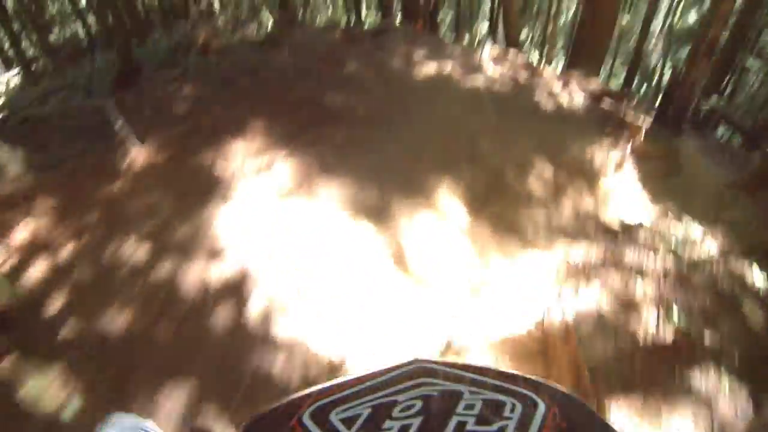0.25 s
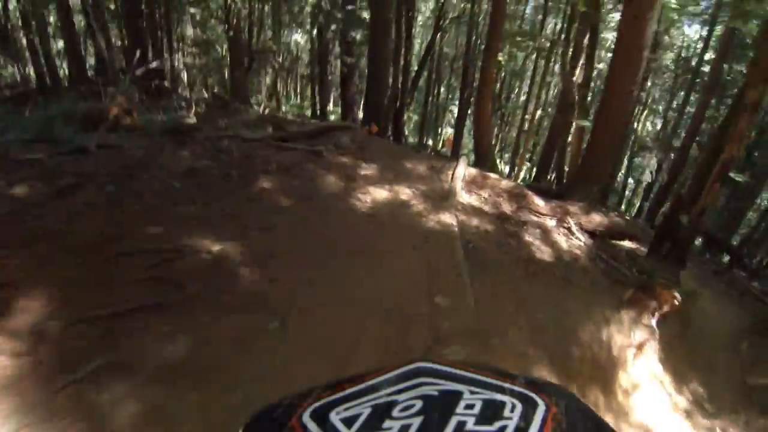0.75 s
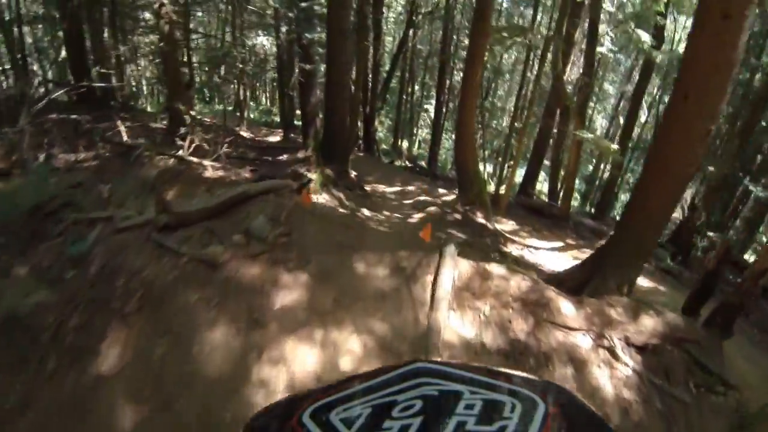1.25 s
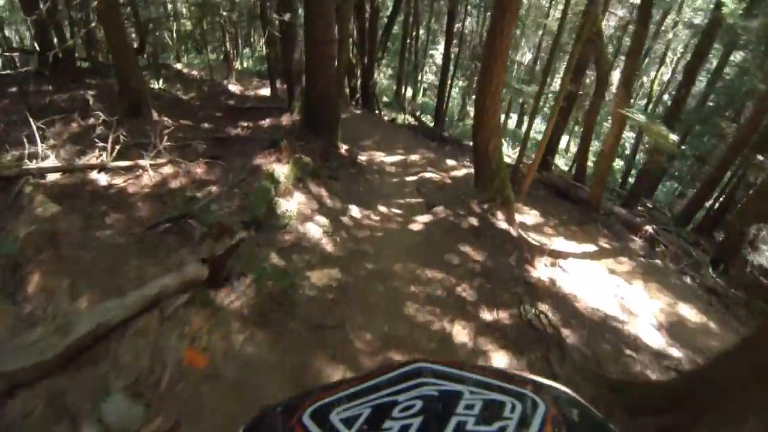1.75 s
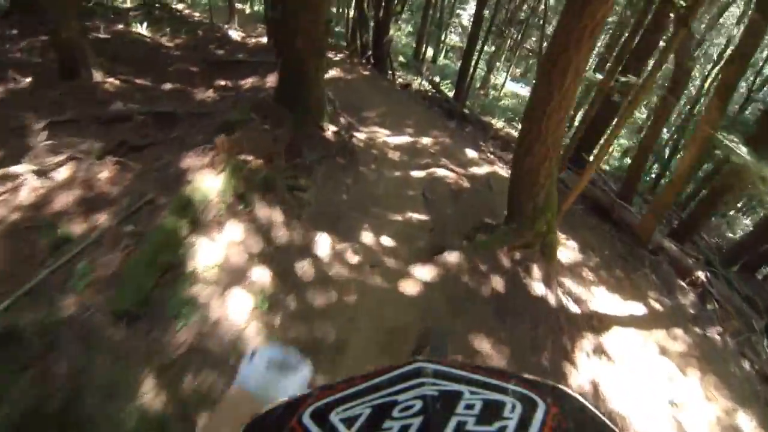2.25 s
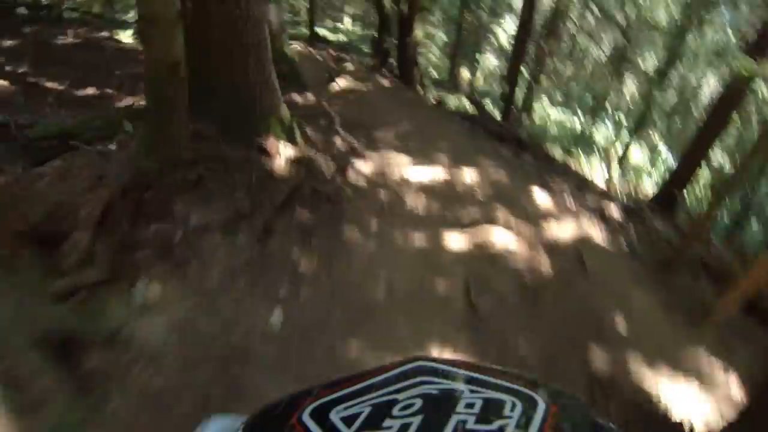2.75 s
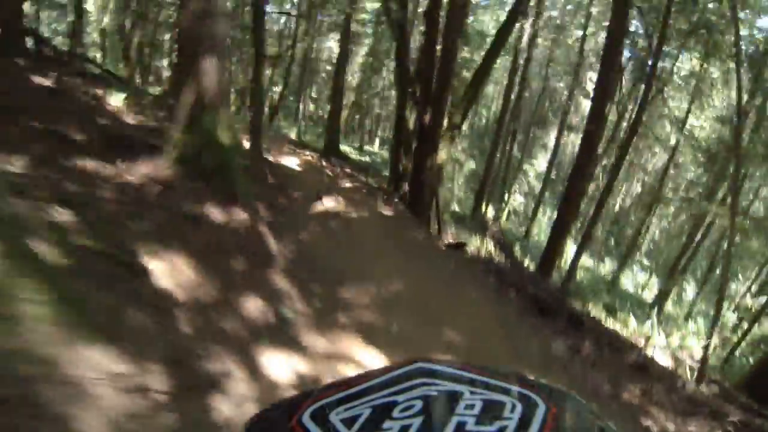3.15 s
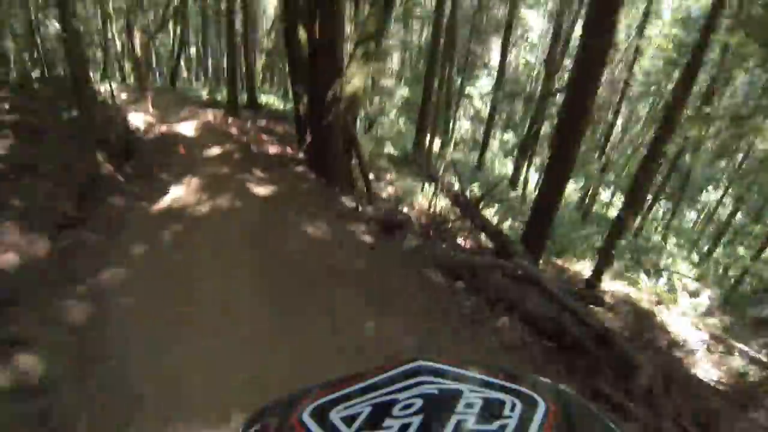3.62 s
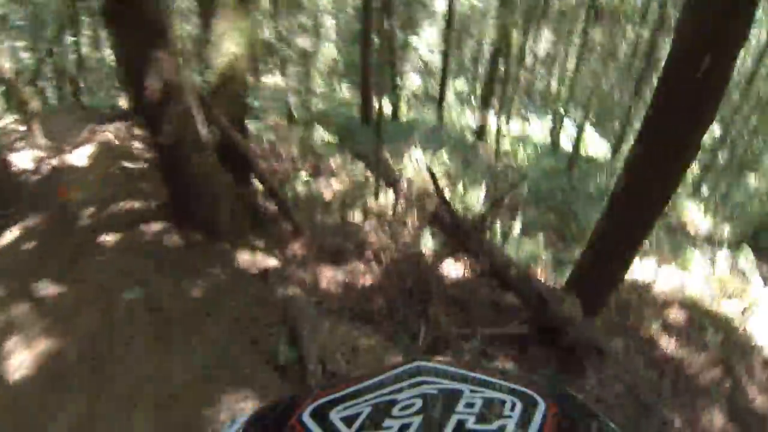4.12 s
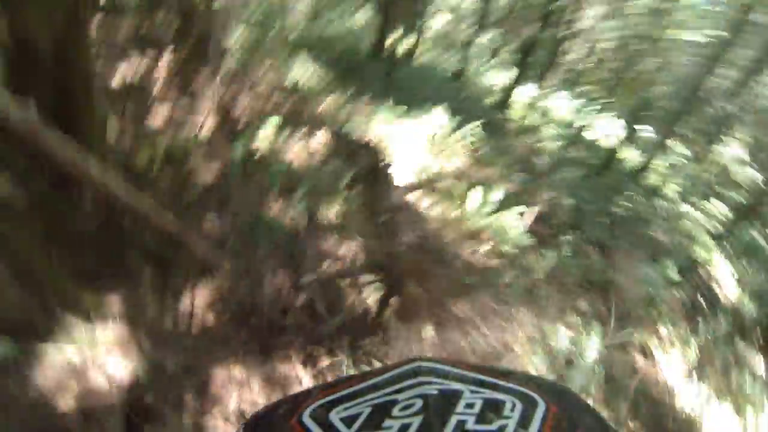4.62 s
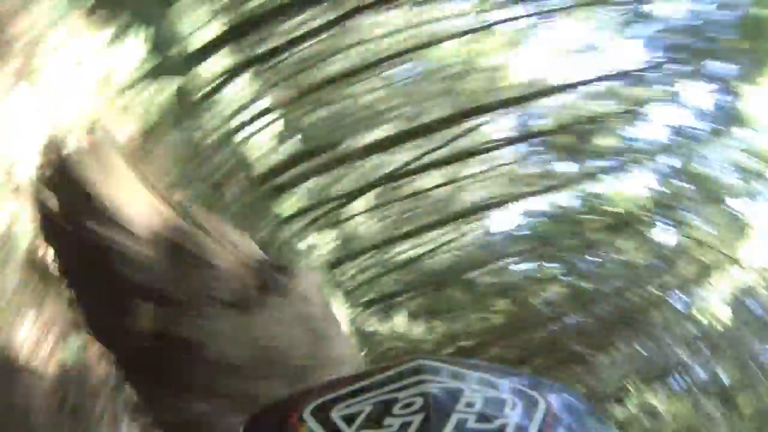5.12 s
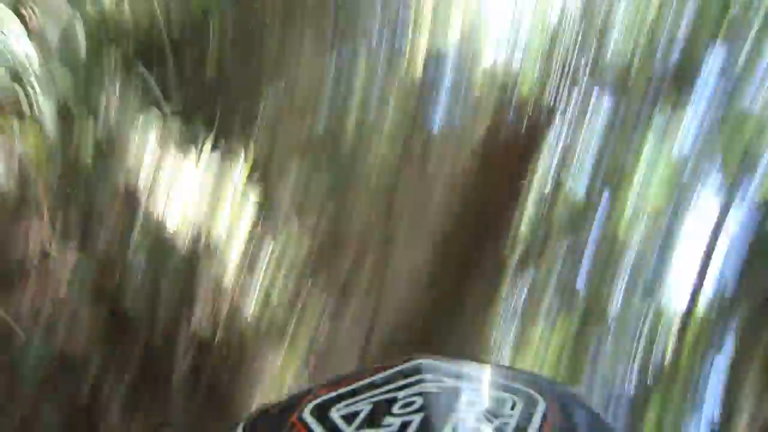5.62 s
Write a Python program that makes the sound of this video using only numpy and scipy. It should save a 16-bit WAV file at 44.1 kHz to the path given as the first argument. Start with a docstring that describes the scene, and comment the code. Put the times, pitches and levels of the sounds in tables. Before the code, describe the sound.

Stereo helmet microphone, dry outdoor sound with no echo. An early rattle over bumps settles into rapid, quiet freewheel clicking over soft tyre scrub. A short hop ends in a heavy clattering landing, and a second is harder still. A rough sliding tyre follows, then irregular metallic knocks, sharp twig cracks, dull body thuds and bursts of leafy hiss shifting from side to side.

```python
"""Mountain bike on a forest trail

A ride over dirt, heard in stereo at the rider's helmet, ends with bike and rider tumbling through brush.
Tyres, dust and skids are noise broken into grains; spokes and a brief whistle are grains in narrow bands.
Frame knocks, chain slaps, thuds, snaps and freewheel ticks are short noise bursts that ring resonances.
Shaking adds a rumble, and a low hum runs beneath it all.
"""
import sys
import numpy as np
from scipy import signal
from scipy.fft import rfft, irfft, next_fast_len
from scipy.io import wavfile

SR = 44100
rng = np.random.default_rng(int(sys.argv[2]) if len(sys.argv) > 2 else 0)


def transcribe(signal):
    """Save signal, clipped to [-1, 1], as a 16-bit WAV file at the path in sys.argv[1]."""
    frames = np.atleast_2d(signal).T
    limited = np.clip(frames, -1, 1)
    pcm = np.round(limited * 32767).astype(np.int16)
    wavfile.write(sys.argv[1], SR, pcm)


N = 258850  # length in samples

# Levels of all sources are before the clipping and treble cut in record().
# Plain rolling: (time [s], tyre casing scrub [dB], thrown dust and litter [dB])
ROLLING = [(0, -51, -43), (0.24, -40.5, -54), (0.55, -44.5, -50), (0.7, -41, -39), (0.85, -39, -39.5),
           (1.2, -45, -43.5), (1.55, -44.5, -49), (1.95, -46, -49), (2.25, -51, -47), (2.85, -42, -38.5),
           (3.4, -52, -39), (3.66, -49, -40.5), (4.0, -66, -37), (4.35, -35, -39.5), (4.62, -32, -31),
           (4.9, -40.5, -37), (5.45, -39, -29.5), (5.7, -42, -36.5), (5.87, -46, -40)]
# Tyres or bodies ploughing into loose ground: (start [s], hold from start [s], scrub [dB], dust [dB])
CRUNCHES = [(0.057, 0.025, -37, -38.5), (0.315, 0.24, -38.5, -39.5), (0.563, 0.079, -29, -32),
            (1.733, 0.071, -37.5, -39), (2.485, 0.15, -23.5, -27), (2.685, 0.053, -30, -28),
            (3.04, 0.069, -24, -27.5), (3.11, 0.098, -21, -30), (3.234, 0.089, -27.5, -28),
            (4.015, 0.075, -36, -54), (4.11, 0.2, -33, -34), (4.375, 0.18, -31.5, -28.5),
            (4.655, 0.081, -33.5, -31), (4.958, 0.22, -36.5, -41), (5.195, 0.2, -34.5, -24),
            (5.49, 0.078, -32, -39)]
CRUNCH_ATTACK_S, CRUNCH_RELEASE_DB_PER_S = 0.028, 245
GRIT_DB = -1  # grit against the mean of the scrub and dust levels
# Tyres off the ground: (leave [s], land [s], fading [dB/s])
HOPS = [(2.282, 2.484, 126), (2.955, 3.054, 250)]
# Where the tyres lie from the helmet: (time [s], left minus right [dB])
TYRE_SIDE = [(0, 2), (2.4, 3.5), (2.6, 1.5), (3.0, 5), (3.7, 6), (4.2, 1.5), (4.7, 2), (4.95, -8),
             (5.28, 4), (5.5, -5.5), (5.87, 9.5)]
# Resonances of the tyre casing: (pitch [Hz], width [Hz], level [dB])
TYRE_MODES = [(350, 150, -3.5), (501, 510, -1), (675, 400, 0), (982, 690, -4)]
# Resonances of crunching grit: (pitch [Hz], width [Hz], level [dB])
GRIT_MODES = [(1460, 260, -21), (2044, 2390, 22), (3870, 4800, -11)]
# Broad bands of dust hiss: (pitch [Hz], width [Hz], level [dB])
DUST_MODES = [(4360, 10700, 5.5), (8720, 15400, 1), (12040, 37000, 4)]
# Spokes singing: (time [s], level [dB])
SPOKE_LEVEL = [(.4, -61), (.6, -42), (1.3, -43.5), (1.6, -65), (2.2, -80)]
# Resonances of the spokes: (pitch [Hz], width [Hz], level [dB])
SPOKE_MODES = [(1250, 40, 0), (1590, 110, 3), (2540, 110, -7), (4100, 390, -10.5)]
# Shaking at the helmet: (time [s], level [dB])
SHAKE_LEVEL = [(0, -32.5), (0.15, -40), (0.33, -38.5), (0.7, -37.5), (0.85, -44), (1.55, -46),
               (1.72, -42.5), (2.25, -43), (2.33, -29.5), (2.47, -35), (2.57, -19.5), (2.72, -34),
               (3.15, -27.5), (3.4, -38.5), (3.76, -36), (3.9, -43.5), (4.36, -45.5), (4.42, -32),
               (4.62, -43), (4.7, -26), (4.8, -42), (5.1, -39), (5.47, -28), (5.56, -31), (5.87, -48)]
# Resonances of the shaking rumble: (pitch [Hz], width [Hz], level [dB])
RUMBLE_MODES = [(139, 160, -4.5), (244, 380, -2)]
DEEP_HZ, DEEP_DB = 54, -19  # deep part of the shaking, level against the rumble
HUM_HZ, HUM_WIDTH_HZ, HUM_DB = 70.8, 5.3, -49.5
# Chain and cable slaps: (time [s], peak [dB], centre [Hz])
SLAPS = [(0.0152, -14.5, 7250), (0.413, -11, 4540), (0.4456, -9.5, 5440), (0.5773, -7.5, 5330),
         (0.6075, -10, 4830), (0.6429, -8, 4830), (2.37, -34, 8200), (2.51, -17, 10000),
         (2.5275, -2.5, 4400), (2.5521, -9.5, 4450), (2.605, 0.5, 10600), (2.635, -13, 11800),
         (2.7196, -18, 12000), (3.0677, 2, 5400), (3.1028, -10.5, 4860), (3.1787, -11.5, 11200),
         (3.1945, -10.5, 5110), (3.2191, -7, 9660), (3.254, -9.5, 4800), (3.2819, -11, 11400),
         (3.3448, -3.5, 11100), (3.3536, -6, 4600), (3.478, -18, 4400), (3.6785, -17.5, 9130),
         (3.714, -10, 10800), (3.7277, -5.5, 11000), (3.776, -16.5, 7820), (4.0303, -3, 9100),
         (4.0635, -10, 7200), (4.127, -2.5, 8600), (4.3907, -9, 12000), (4.4022, 0.5, 7000),
         (4.4514, -13, 5120), (4.5033, -3, 5100), (4.7272, -9, 8000), (4.7414, -9, 4840),
         (4.8679, -9, 4820), (5.049, -19, 10400), (5.1408, -13, 7600), (5.1737, -7, 9400),
         (5.2108, -12, 4400), (5.2562, -4, 12100), (5.3614, -4.5, 9500), (5.4113, -14, 9880),
         (5.6381, -15, 9850)]
# Resonances of the chain: (pitch [Hz], width [Hz], level [dB])
CHAIN_MODES = [(3390, 1260, 4), (5070, 420, 6.5), (6930, 1680, 2), (10800, 3400, 5.5), (12300, 320, 0),
               (12400, 2000, -3.5)]
# Blows on the frame: (time [s], peak [dB], centre [Hz], left minus right [dB])
KNOCKS = [(0.016, -14.5, 3500, 2.5), (0.263, -8.5, 910, -0.5), (0.362, -14, 724, 4.0),
          (0.392, -25, 1150, 3.5), (0.413, -17, 2930, 0), (0.448, -19.5, 1690, 3), (0.572, -14.5, 1060, -1),
          (0.606, -14.5, 2610, -3), (0.761, -15, 3650, 0), (2.362, -25.5, 1380, 3), (2.486, -14.5, 1080, 3),
          (2.51, -6, 630, 3), (2.568, -7, 1120, -1), (2.602, -10.5, 840, 1), (2.719, -16, 1130, 0),
          (2.853, -17, 1140, 5), (2.982, -17, 1680, 4), (3.057, -7, 680, 4.5), (3.077, -10, 790, -2),
          (3.138, -1, 780, 5.5), (3.193, -1, 754, 4), (3.257, -5.5, 2150, 2), (3.346, -12, 770, 2),
          (3.71, -12, 690, 5.5), (3.727, -9.5, 705, 5.5), (4.03, -11, 770, 2.5), (4.126, -12, 1720, 2),
          (4.24, -6.5, 810, -2.0), (4.301, -11.5, 1620, 0.5), (4.401, -5.5, 700, 4.5),
          (4.423, -8.5, 1950, 2.0), (4.475, -13, 813, -5), (4.504, -4, 1700, 1), (4.684, -15, 1010, 6),
          (4.728, -13, 1080, 7), (4.867, -17, 990, -11.5), (4.949, -8.5, 1310, 6.5), (5.007, -8, 940, -9.5),
          (5.077, -17.5, 860, -14), (5.173, -17.5, 1000, -8), (5.363, -12, 1970, 4), (5.423, -10, 2360, 7),
          (5.433, -18, 2020, -10)]
# Resonances of the frame: (pitch [Hz], width [Hz], level [dB])
FRAME_MODES = [(342, 146, 14), (558, 290, 10), (804, 516, 10.5), (1107, 860, 11), (1570, 770, 6),
               (2020, 1120, -6.5), (2624, 470, -9.5), (3550, 400, -4)]
# The frame's hollow ring: (pitch [Hz], width [Hz], level [dB])
HOLLOW_MODES = [(548.6, 69, 13.5)]
# Coasting stretches, the turn of the wheel against the hub: (time [s], ratchet teeth passed [count])
COASTS = [
    [(.058, 0), (.129, 1), (.172, 2), (.253, 5), (.304, 6), (.431, 11), (.491, 12), (.526, 14), (.553, 15)],
    [(.724, 0), (.826, 5), (.9, 10), (1.005, 16), (1.349, 34), (1.492, 41), (1.629, 47), (1.669, 49),
     (1.701, 51), (1.82, 61), (1.929, 68), (2.156, 82), (2.253, 86)],
    [(2.759, 0), (2.907, 10), (2.999, 14)],
]
# Freewheel ticks, around which each tick varies: (time [s], peak [dB])
TICK_LEVEL = [(.1, -25.5), (.5, -24.5), (.9, -24.5), (1.2, -28.5), (2.2, -26.5), (2.8, -25), (3.0, -26)]
# Resonances of the pawl: (pitch [Hz], width [Hz], level [dB])
PAWL_MODES = [(2420, 5600, -3), (6320, 100, 3), (6700, 15000, 0), (9730, 880, 2.5), (10830, 780, 6),
              (13500, 1700, 7), (13700, 2200, -2.5)]
# Dull thuds: (time [s], peak [dB], centre [Hz])
THUDS = [(0.261, -9.5, 345), (0.41, -18.5, 200), (0.688, -23.5, 143), (2.546, -17.5, 282),
         (2.574, -9.5, 355), (2.658, -10, 176), (3.005, -20, 180), (3.222, -15.5, 122), (4.439, -18.5, 240),
         (4.662, -24, 112), (4.734, -18.5, 174), (5.083, -28.5, 148), (5.145, -23, 192),
         (5.345, -20.5, 201), (5.409, -11, 185), (5.432, -11.5, 178), (5.457, -17, 308), (5.511, -23, 260),
         (5.541, -12.5, 240), (5.558, -16, 191)]
# Dry snaps of twigs and pebbles: (time [s], peak [dB], centre [Hz], left minus right [dB])
SNAPS = [(0.447, -9, 1620, 3.5), (1.682, -13.5, 1490, 1.5), (1.817, -20.5, 1850, -1), (3.116, -6, 776, 1),
         (3.444, -11.5, 1780, 12), (3.458, -3, 700, 5), (4.551, -2, 3730, -1.0), (4.952, -11, 1310, 5),
         (5.175, -7, 929, -9), (5.211, -5.5, 4300, 3), (5.256, -11, 2790, -0.5), (5.265, -3, 2460, 4),
         (5.334, -11, 910, 8), (5.347, -7, 1950, 4), (5.721, -16, 724, -15)]
# A thin brief whistle: (time [s], level [dB])
WHISTLE_LEVEL = [(2.255, -90), (2.28, -50), (2.33, -55), (2.37, -90)]
# The rear tyre sliding: (time [s], scrub [dB], grit [dB])
SKID_LEVEL = [(3.32, -38, -30.5), (3.38, -23.5, -22.5), (3.47, -16, -19.5), (3.56, -21, -24),
              (3.66, -27.5, -27), (3.76, -22.5, -28), (3.88, -20, -37), (3.98, -21.5, -51),
              (4.06, -34, -60)]
# Sliding tyre casing: (pitch [Hz], width [Hz], level [dB])
SLIDE_LOW_MODES = [(516, 440, -3.5), (706, 290, 1.5), (914, 800, -2.5)]
# Sliding tread on grit: (pitch [Hz], width [Hz], level [dB])
SLIDE_HIGH_MODES = [(1465, 260, 3), (2170, 870, 1.5)]
# How the two sides differ: (pitch [Hz], left minus right [dB], phase by which left leads [rad])
EAR_DIFFERENCE = [(100, -0.5, 0.07), (4860, 1, -0.02), (7500, 1.5, -1.6), (10500, -2.5, -0.94),
                  (11600, -5.5, 1), (15900, 1, -2.5)]

STEADY_POWER = 1.3  # even hiss under the grains
# Time for a burst to fade by 60 dB; that of knocks holds at 1000 Hz
KNOCK_FADE_S, SLAP_FADE_S, THUD_FADE_S, SNAP_FADE_S = 0.082, 0.041, 0.059, 0.016
KNOCK_FADE_PER_OCTAVE = 0.99  # higher knocks die sooner
THUD_WIDTH, SNAP_WIDTH = 0.85, 1.39  # share of the centre pitch
CONTACT = 4.67  # size of the first contact against its rebounds
SPOT_DB = 2.5  # typical random change of each resonance from blow to blow
CRACK, CRACK_RISES = 0.85, 13.2  # extra strength of the first moments, and their length in rise times
CLIP_LEVEL, TOP_HZ = .93, 15750


def undb(db):
    """Turn a level in dB into a gain."""
    return 10 ** (np.asarray(db) / 20)


def curve(table, column=1):
    """Draw straight lines between the rows of one table column, giving a value at every sample."""
    rows = np.array(table)
    return np.interp(np.arange(N) / SR, rows[:, 0], rows[:, column])


def ring(x, modes, passes=1):
    """Send x through side-by-side resonances, each applied the given number of passes."""
    size = next_fast_len(x.shape[-1] + 4096)
    f = np.fft.rfftfreq(size, 1 / SR) + 1e-3  # avoids dividing by zero
    gain = 0
    for k, (hz, width, db) in enumerate(modes):
        resonance = 1 / (1 + 1j * (f - hz ** 2 / f) / width) ** passes
        # after an odd number of passes, neighbours need opposite signs
        # so that they do not cancel between their peaks
        gain = gain + (-1) ** (k * passes) * undb(db) * resonance
    return irfft(rfft(x, size) * gain, size)[..., :x.shape[-1]]


def pair(size, alike):
    """Make left and right noise of a given likeness by mixing shared and opposite noise."""
    alike = np.clip(alike, -1, 1)
    shared, opposite = rng.standard_normal((2, size))
    return np.sqrt((1 + alike) / 2) * shared + np.sqrt((1 - alike) / 2) * opposite * np.array([[1], [-1]])


def pan(db):
    """Share a left minus right level between the two sides as gains."""
    return undb(np.array([db, -db]) / 2)


def grains(modes, per_s, spread_db, grain_s, alike, passes=2):
    """Break noise into short grains of very uneven size that ring the modes; rms level 1."""
    starts = rng.random(N) < per_s / SR
    sizes = starts * undb(spread_db * np.minimum(rng.exponential(size=N), 4))
    fade = np.exp(-1 / (grain_s * SR))
    power = STEADY_POWER + signal.lfilter([1], [1, -fade], sizes ** 2)
    x = ring(np.sqrt(power) * pair(N, alike), modes, passes)
    return x / np.sqrt(np.mean(x ** 2))


def add_blow(out, s, db, hz, fade_s, pan_db, modes, octaves, alike, rise_s, uneven_db, passes=2):
    """Strike once: a sharp contact and uneven dying rebounds ring most the modes nearest the centre pitch."""
    t = np.arange(8192) / SR
    uneven = undb(uneven_db * np.repeat(rng.exponential(size=256), 32))
    rise = 1 - np.exp(-t / rise_s)
    fade = np.exp(-np.log(1000) * t / max(fade_s, .005))
    burst = pair(len(t), alike) * uneven * rise * fade
    burst *= 1 + CRACK * np.exp(-t / (CRACK_RISES * rise_s))
    burst[:, int(rise_s * SR)] += CONTACT * uneven_db
    # where the blow lands favours some modes
    spot_db = SPOT_DB * rng.standard_normal(len(modes))
    near = []
    for (mode_hz, width, level), spot in zip(modes, spot_db):
        distance = np.log2(mode_hz / hz) / octaves
        near.append((mode_hz, width, level + spot - 6 * distance ** 2))
    x = ring(burst, near, passes)
    # set the peak of the left-right average, then pan
    x *= undb(db) / np.abs(x.mean(axis=0)).max() * pan(pan_db)[:, None]
    i = int(s * SR)
    out[:, i:i + len(t)] += x[:, :N - i]


def ground_level(column):
    """Add rolling and crunch power for scrub (1) or dust (2), in dB; it fades while the tyres are in the air."""
    t = np.arange(N) / SR
    power = undb(curve(ROLLING, column)) ** 2
    for row in CRUNCHES:
        since = t - row[0]
        attack = np.clip(since / CRUNCH_ATTACK_S, 0, 1)
        release_db = CRUNCH_RELEASE_DB_PER_S * np.maximum(since - row[1], 0)
        power = power + attack * undb(row[column + 1] - release_db) ** 2
    level = 10 * np.log10(power)
    for leave, land, rate in HOPS:
        level = level - rate * (t - leave) * (t > leave) * (t < land)
    return level


def tyres():
    """Tyre casings scrub and grit crunches from below, while loose dust hisses all round."""
    scrub_db, dust_db = ground_level(1), ground_level(2)
    scrub = undb(scrub_db) * grains(TYRE_MODES, 900, 4.1, 0.0048, 0.69)
    grit_db = (scrub_db + dust_db) / 2 + GRIT_DB
    grit = undb(grit_db) * grains(GRIT_MODES, 1400, 5.5, 0.0028, 0.84)
    dust = undb(dust_db) * grains(DUST_MODES, 500, 4.23, 0.0022, 0.16)
    return (scrub + grit) * pan(curve(TYRE_SIDE)) + dust


def spokes():
    """Small grains keep the narrow resonances of the spokes singing."""
    singing = grains(SPOKE_MODES, 270, 1.4, 0.009, 1.0, passes=1)
    return undb(curve(SPOKE_LEVEL)) * singing * pan(curve(TYRE_SIDE))


def shaking():
    """Shaking gives a rumble that differs left and right, with a deep part the same on both sides."""
    rumble = grains(RUMBLE_MODES, 60, 3.3, 0.0029, 0.011)
    deep = undb(DEEP_DB) * grains([(DEEP_HZ, 35, 0)], 160, 1.6, 0.016, 1.0)
    return undb(curve(SHAKE_LEVEL)) * (rumble + deep)


def hum():
    """A steady low tone wavers because narrow-band noise at the same pitch is mixed in."""
    tone = np.sqrt(2) * np.sin(2 * np.pi * HUM_HZ * np.arange(N) / SR)
    wobble = grains([(HUM_HZ, HUM_WIDTH_HZ, 0)], 230, 3.8, 0.03, 0.53)
    return undb(HUM_DB) * (tone + .35 * wobble)


def chain_slaps():
    """Chain and cables slap, ringing bright resonances."""
    out = np.zeros((2, N))
    for s, db, hz in SLAPS:
        add_blow(out, s, db, hz, SLAP_FADE_S, 1.2, CHAIN_MODES, 1.2, .6, .0003, 2.2, passes=1)
    return out


def frame_knocks():
    """Blows ring the frame and its hollow tone; higher knocks die a little sooner."""
    out = np.zeros((2, N))
    for s, db, hz, pan_db in KNOCKS:
        fade_s = KNOCK_FADE_S * KNOCK_FADE_PER_OCTAVE ** np.log2(hz / 1000)
        add_blow(out, s, db, hz, fade_s, pan_db, FRAME_MODES + HOLLOW_MODES, .7, .85, .0005, 3.2)
    return out


def freewheel():
    """A pawl drops at every ratchet tooth, each a little early or late, louder or softer."""
    out, loud = np.zeros((2, N)), np.array(TICK_LEVEL)
    times = []
    for rows in COASTS:
        seconds, teeth = np.array(rows).T
        times.extend(np.interp(np.arange(rows[-1][1] + 1), teeth, seconds))
    for s, (late, size) in zip(times, rng.standard_normal((len(times), 2))):
        db = np.interp(s, loud[:, 0], loud[:, 1]) + 1.5 * size
        start_s = s - .0012 + 0.00055 * late
        add_blow(out, start_s, db, 13000, .022, 1.2, PAWL_MODES, 4.0, .6, .0002, .8)
    return out


def thuds():
    """Dull blows each ring one low, broad resonance, almost unlike on the two sides."""
    out = np.zeros((2, N))
    for s, db, hz in THUDS:
        add_blow(out, s, db, hz, THUD_FADE_S, 1.5, [(hz, THUD_WIDTH * hz, 0)], 1, .05, .002, 3.0)
    return out


def snaps():
    """Twigs and pebbles snap: very short bursts, each in one broad resonance."""
    out = np.zeros((2, N))
    for s, db, hz, pan_db in SNAPS:
        add_blow(out, s, db, hz, SNAP_FADE_S, pan_db, [(hz, SNAP_WIDTH * hz, 0)], 1, .8, .0003, 2.2)
    return out


def whistle():
    """A thin, brief whistle is grainy noise in a narrow band at 8000 Hz."""
    return undb(curve(WHISTLE_LEVEL)) * grains([(8000, 150, 0)], 300, 1.5, .003, .6)


def skid():
    """The locked rear tyre roars in a narrow band; its upper rasp dies first."""
    t = np.arange(N) / SR
    roar = undb(curve(SKID_LEVEL, 1)) * grains(SLIDE_LOW_MODES, 610, 2.0, 0.0054, 0.89)
    rasp = undb(curve(SKID_LEVEL, 2)) * grains(SLIDE_HIGH_MODES, 900, 4.2, 0.0014, 0.95)
    sliding = (t > SKID_LEVEL[0][0]) * (t < SKID_LEVEL[-1][0])
    return sliding * (roar + rasp) * pan(curve(TYRE_SIDE))


def scene():
    """Add up everything heard at the helmet."""
    ride = tyres() + spokes() + shaking() + hum()
    hits = chain_slaps() + frame_knocks() + freewheel() + thuds() + snaps()
    return ride + hits + whistle() + skid()


def record(dry):
    """Left and right differ in level and phase with pitch; peaks clip and the top treble is cut."""
    f = np.fft.rfftfreq(N, 1 / SR) + 1  # avoids the logarithm of zero
    rows = np.array(EAR_DIFFERENCE)
    db = np.interp(np.log(f), np.log(rows[:, 0]), rows[:, 1])
    lead = np.interp(np.log(f), np.log(rows[:, 0]), rows[:, 2])
    # each side takes half of the difference
    half = undb(db / 2) * np.exp(.5j * lead)
    x = irfft(rfft(dry) * np.array([half, 1 / half]), N)
    clipped = np.clip(x, -CLIP_LEVEL, CLIP_LEVEL)
    treble_cut = signal.ellip(12, .2, 85, TOP_HZ, fs=SR, output="sos")
    return signal.sosfilt(treble_cut, clipped)


dry = scene()
out = record(dry)
transcribe(out)
```